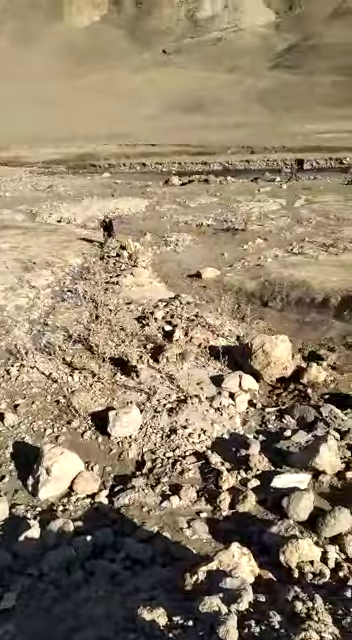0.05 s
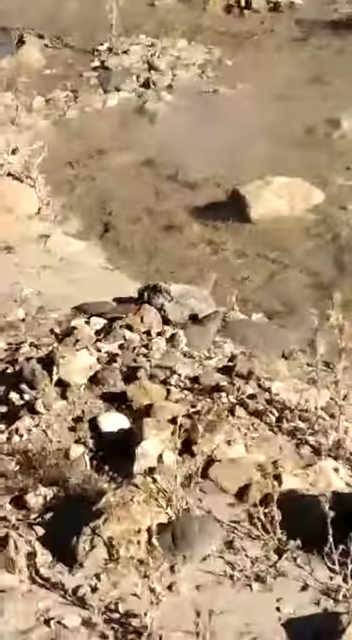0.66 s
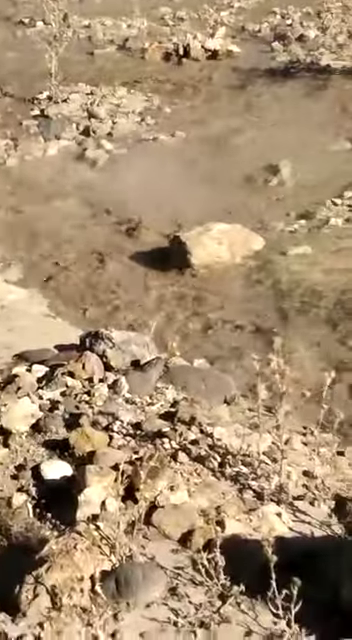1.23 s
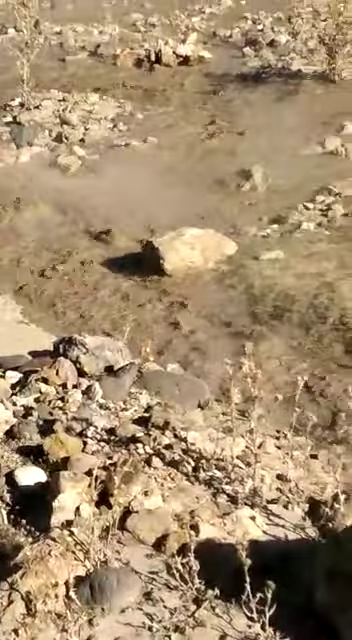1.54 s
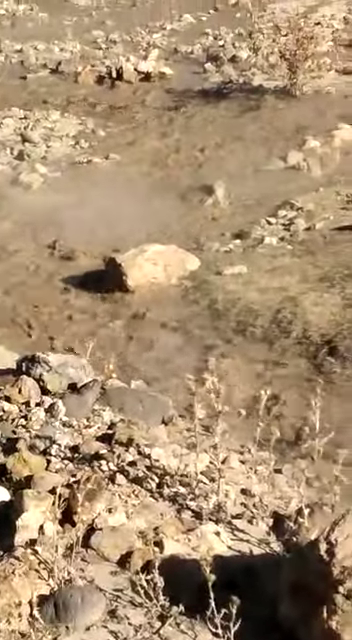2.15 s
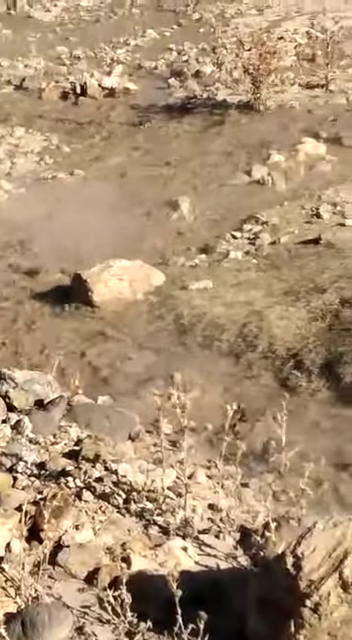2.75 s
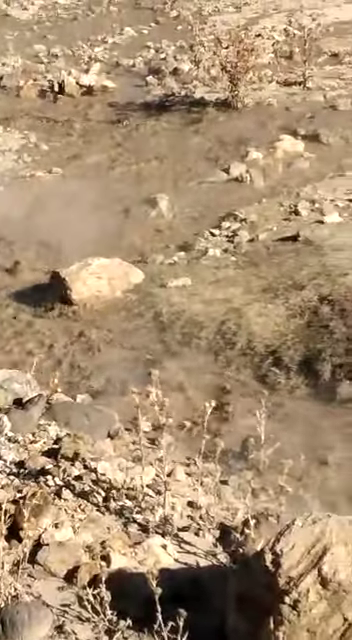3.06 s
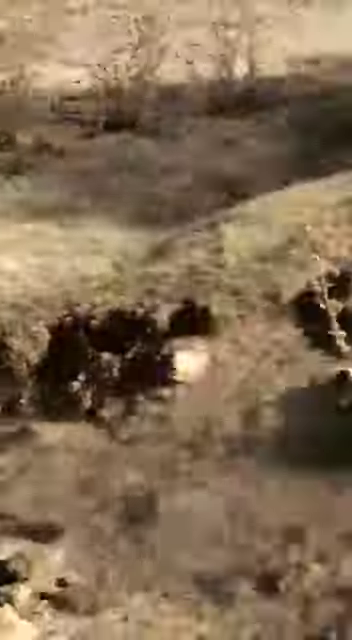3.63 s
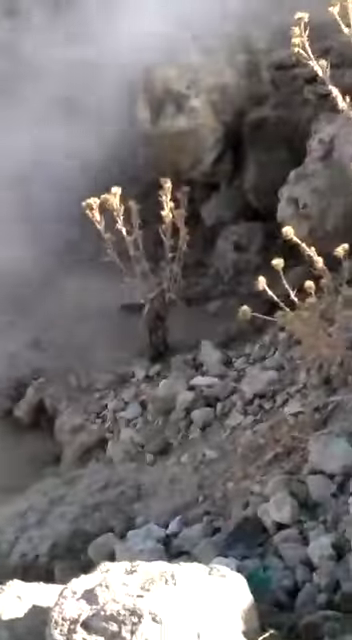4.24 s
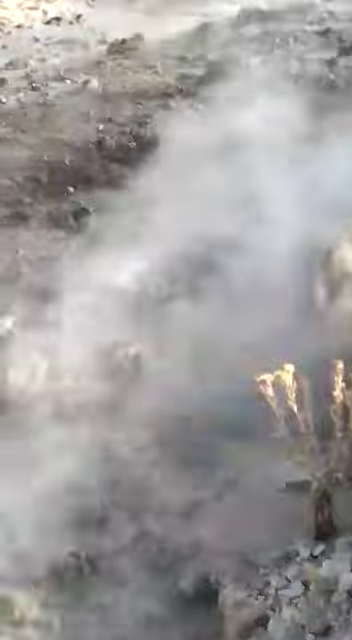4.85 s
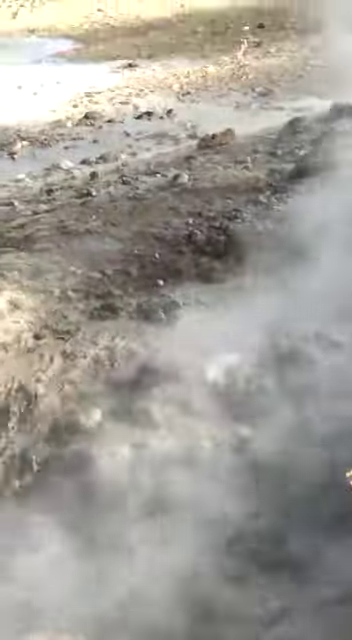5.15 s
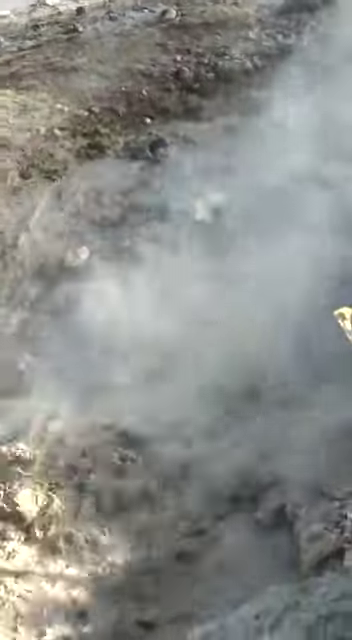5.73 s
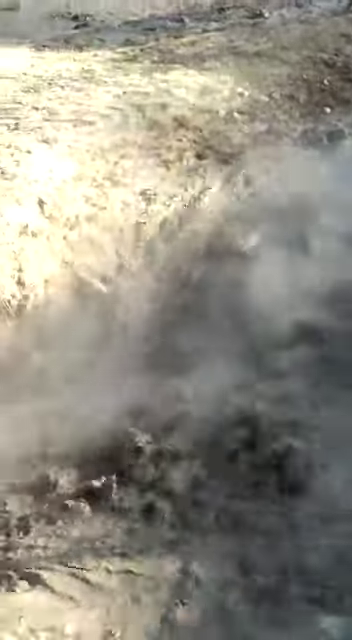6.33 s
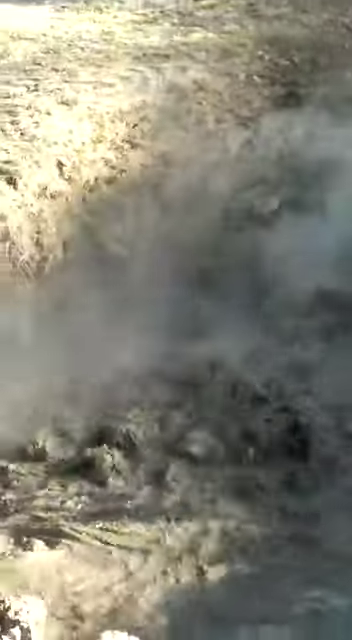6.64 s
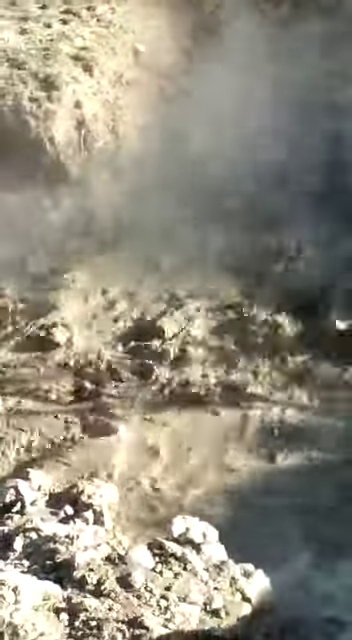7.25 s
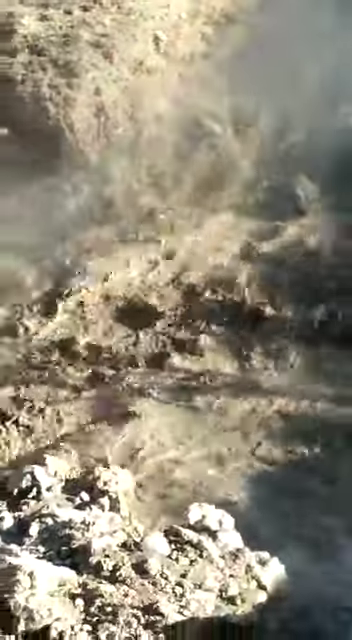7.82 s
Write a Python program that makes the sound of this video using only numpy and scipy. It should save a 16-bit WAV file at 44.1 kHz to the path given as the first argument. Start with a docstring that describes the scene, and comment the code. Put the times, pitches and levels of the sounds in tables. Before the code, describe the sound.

A hot spring churns in the open, an even rush of foam and spray mixed with bubbling, with no echo. Gusty wind buffets the microphone with a low rumble and sharp flaps, hardest on the left and strongest in the first three seconds. The wind then eases into lighter, scattered puffs on both sides while the water carries on unchanged. One tiny tick sounds on the right about halfway.

```python
"""Hot spring in a gusty wind

A hot spring churns and steams in the open, with no echo: an even rush of foam and spray noise
mixed with ringing bubbles, heard by two small microphones. Turbulent gusts buffet each microphone
port on its own, the left hardest, with a rumble and sharp flaps. One tiny tick sounds on the right."""
import sys
import numpy as np
from scipy import signal
from scipy.fft import rfft, irfft, next_fast_len
from scipy.io import wavfile

SR = 44100
rng = np.random.default_rng(int(sys.argv[2]) if len(sys.argv) > 2 else 0)


def file_out(sig):
    """Save sig as 16-bit WAV at sys.argv[1]."""
    # one column per channel
    cols = np.atleast_2d(sig).T
    # limit, then scale
    lim = np.clip(cols, -1, 1)
    pcm = np.round(lim * 32767).astype(np.int16)
    wavfile.write(sys.argv[1], SR, pcm)


N = 356328

# Slow changes in the water sound. Each row: time in seconds, then churn, splash and spray gains in dB.
WATER_LEVELS = [(0, 1.4, -1, -.3), (.9, .5, 2, .6), (2.2, 0.7, 0.3, 0), (3.3, .4, 1.7, -1),
                (4.15, 0.35, -0.6, 0), (5.2, -0.1, 0.8, 0.3), (5.75, 0.7, -0.5, -1), (6.5, .7, 0, 0.1),
                (8.08, 0.5, -.5, -.6)]
SPLASH_FROM_HZ, SPRAY_FROM_HZ = 1400, 2400
# The water's spectrum at each microphone. Each row: frequency in Hz, spectral density in dB.
WATER_SPECTRUM_LEFT = [(60, -69), (200, -64), (360, -66.5), (520, -61.5), (720, -65), (930, -64.5),
                       (1600, -71.8), (2080, -66.8), (2300, -72), (2900, -85), (3800, -89), (5200, -100),
                       (9000, -115.5), (15500, -120)]
WATER_SPECTRUM_RIGHT = [(60, -79), (200, -60), (310, -67.5), (430, -62), (570, -60), (750, -65),
                        (1100, -66), (1600, -69.5), (2150, -70.5), (3000, -81.5), (4800, -88.5),
                        (7200, -95), (10500, -99), (15500, -115)]
# Water sound common to both microphones. Each row: frequency in Hz, share of the power.
COMMON_SHARE = [(100, .8), (650, .94), (1100, .86), (1550, .68), (2050, .8), (3000, .46), (4200, .52),
                (7000, .15), (15000, .08)]
# The vent's later arrival on the left. Each row: frequency in Hz, phase lag in radians.
LEFT_LAG = [(200, .1), (650, 0.16), (1300, 1.36), (1750, 0.15), (2100, 1.56), (2500, 2.68), (3500, 3.4),
            (4500, 5.2), (6500, 9.5)]
# The left microphone turns towards the steam. Each row: time in seconds, treble gain in dB.
FACING_TREBLE = [(0, -4), (1.2, -2), (2.1, -4.5), (3.6, -3.2), (4.15, -0.7), (8.08, -1.5)]

# The breeze at each port. Each row: time in seconds, strength in dB, tilt towards the bass in dB.
PORT_BREEZE_LEFT = [(0, -19.5, -2.5), (.4, -17.5, -0.5), (1.15, -19.5, -1), (1.55, -23, -3),
                    (2.15, -33, -5.5), (2.78, -18.5, -0.5), (2.98, -30.5, -2), (3.7, -35.5, 6.5),
                    (4.55, -38, 0), (4.9, -27.5, 6.5), (5.45, -32.5, 7), (6.0, -40, 2), (6.8, -43.5, 3.5),
                    (7.6, -36, 4.5), (8.08, -35, 0.5)]
PORT_BREEZE_RIGHT = [(0, -29, -1), (1.1, -27.5, 7), (1.4, -20.5, -1), (1.75, -26.5, 1), (2.2, -24, 0),
                     (3.35, -23, 1.5), (4.15, -42, -8), (4.65, -39, 3.5), (5.3, -36, 4), (5.7, -42.5, 1),
                     (6.4, -29, 4.5), (7.2, -33.5, 2.5), (8.0, -30.5, 1)]
# Gusts across one port. Each row: start in seconds, length in seconds, strength in dB, port.
PORT_GUSTS = [(0.077, 0.14, -12.5, "left"), (0.15, 0.099, -24, "right"), (0.287, 0.063, -11, "left"),
              (0.724, 0.11, -14, "left"), (0.924, .04, -11.5, "left"), (1.217, .15, -11.5, "left"),
              (1.42, 0.096, -18.5, "left"), (1.673, .21, -10.5, "left"), (1.924, 0.08, -12, "left"),
              (2.147, 0.12, -10.5, "left"), (2.271, .15, -10, "left"), (2.597, .11, -19.5, "right"),
              (2.645, 0.046, -11.5, "left"), (2.862, 0.016, -17.5, "left"), (3.14, 0.053, -21, "left"),
              (3.283, .12, -19.5, "right"), (3.786, 0.032, -17.5, "left"), (3.928, 0.046, -21.5, "left"),
              (4.348, 0.014, -25, "left"), (4.66, 0.16, -17, "left"), (4.765, .07, -22, "right"),
              (4.893, 0.031, -15.5, "left"), (4.956, 0.058, -24.5, "right"), (5.09, 0.034, -23, "left"),
              (5.202, 0.014, -19, "right"), (5.218, 0.11, -29, "left"), (5.323, 0.095, -22, "right"),
              (5.554, 0.023, -16, "left"), (5.62, .13, -23.5, "left"), (5.817, 0.02, -28, "right"),
              (6.16, .04, -24.5, "right"), (6.228, 0.051, -27.5, "left"), (6.424, 0.02, -23, "right"),
              (6.7, 0.054, -19.5, "right"), (6.975, 0.04, -29, "left"), (7.088, .03, -28.5, "left"),
              (7.26, 0.021, -34, "left"), (7.32, 0.047, -28.5, "right"), (7.438, 0.16, -23, "left"),
              (7.761, 0.012, -21, "left"), (7.891, 0.21, -25.5, "left"), (8.05, .04, -22.5, "right")]
MODERATE_GUST_DB, GUST_ATTACK_S, GUST_RELEASE_S = -20, .023, .04
# Buffeting in a moderate gust. Each row: frequency in Hz, relative level of an octave band in dB.
BUFFET_SPECTRUM_LEFT = [(16, -41), (30, -28.5), (60, -24), (120, -19), (220, -24.5), (450, -28), (700, -39),
                        (1000, -51.5), (1400, -73.5), (2200, -79)]
BUFFET_SPECTRUM_RIGHT = [(16, -30), (30, -26.5), (60, -23.5), (120, -24), (220, -20.5), (450, -49.5),
                         (700, -40.5), (1000, -32), (2200, -68)]
# Faster air sheds smaller eddies, so highs grow most. Each row: frequency in Hz, dB per dB of gust.
BUFFET_GROWTH = [(20, 0), (45, .5), (90, 0.75), (140, 1.0), (400, 0.85), (1200, 2.2)]
# The hardest flaps of air. Each row: time in seconds, relative level in dB, centre in Hz, port.
HARD_FLAPS = [(0.309, -17, 390, "left"), (0.335, -3, 396, "left"), (0.348, -8, 440, "left"),
              (0.567, -9.5, 500, "left"), (0.948, 0, 480, "left"), (1.168, -8.5, 590, "left"),
              (1.358, -7.5, 800, "left"), (1.415, -6.5, 850, "left"), (1.447, -4.5, 850, "left"),
              (1.587, -4, 805, "left"), (1.673, -11, 704, "left"), (1.718, -11, 624, "left"),
              (1.757, -5.5, 720, "left"), (1.974, 6, 259, "left"), (2.198, -2.5, 820, "left"),
              (2.3, 1, 630, "left"), (2.367, -7, 820, "left"), (2.633, -5.5, 630, "left"),
              (2.666, -6, 700, "left"), (2.855, -0.5, 418, "left"), (3.791, -9, 149, "left"),
              (4.696, -8, 250, "left"), (4.754, -13, 790, "left"), (4.9, -6, 420, "left"),
              (4.953, -10.5, 398, "right"), (5.098, -4.5, 146, "left"), (5.199, -9.5, 90, "right"),
              (5.406, -12.5, 198, "right"), (5.575, -3, 322, "left"), (5.668, -15, 630, "left"),
              (6.727, -12, 520, "right"), (6.756, -11, 300, "right"), (7.478, -10.5, 450, "left"),
              (7.768, -7, 384, "left")]

# The tick's time and modes. Each row: frequency in Hz, level in dB, seconds to fall by 60 dB.
TICK_S, TICK_MODES = 3.921, [(6400, -42, .014), (12900, -54, .012)]


def from_db(db):
    """Amplitude ratio of a level in decibels."""
    return 10 ** (np.asarray(db) / 20)


def unit_power(x):
    """Normalisation to a mean square of one."""
    return x / np.sqrt(np.mean(x ** 2) + 1e-20)


def in_time(rows):
    """Linear interpolation of each column at every sample."""
    times, *columns = np.transpose(rows)
    return [np.interp(np.arange(N) / SR, times, column) for column in columns]


def at_hz(points, hz):
    """Interpolation along log frequency."""
    known_hz, values = np.transpose(points)
    return np.interp(np.log(hz + 1e-9), np.log(known_hz), values)


def drift(rate_hz):
    """Low-passed noise wanders smoothly with a spread of one."""
    pole = np.exp(-40 * np.pi * rate_hz / SR)  # one step per 20 samples
    slow = signal.lfilter([1], [1, -2 * pole, pole * pole], rng.standard_normal(N // 20 + 4002))[4000:]
    return np.interp(np.arange(N) / 20, np.arange(len(slow)), unit_power(slow))


def band(x, low, high):
    """Band-pass filtering, at unit power."""
    return unit_power(signal.sosfilt(signal.butter(2, [low, high], "band", fs=SR, output="sos"), x))


def shaped(x, response):
    """Filtering multiplies the spectrum by a response, a function of Hz."""
    size = next_fast_len(N)
    hz = np.arange(size // 2 + 1) * SR / size
    return irfft(rfft(x, size) * response(hz), size)[:N]


def bubbles(hz, per_s, ring_cycles):
    """Damped resonance: bubbles of uneven strength burst at random, each ringing for a few cycles."""
    bursting = rng.random(N) < per_s / SR
    strength_db = np.minimum(rng.exponential(1, N), 4)
    impulses = np.where(bursting, from_db(strength_db) * rng.choice([-1, 1], N), 1e-18)
    radius = np.exp(-np.log(1000) * hz / (ring_cycles * SR))
    angle = 2 * np.pi * hz / SR
    return unit_power(signal.lfilter([1, 0, -1], [1, -2 * radius * np.cos(angle), radius ** 2], impulses))


def churning(bubble_db, slosh_db, flicker_db):
    """Amplitude modulation: foam hiss and bubbles, near even in power per Hz, swell as water heaves."""
    churn_db, splash_db, spray_db = in_time(WATER_LEVELS)
    edges = np.geomspace(50, 17000, 21)
    foam, slosh, out = rng.standard_normal((2, N)), drift(3.9), 0
    for k, (low, high) in enumerate(zip(edges, edges[1:])):
        hz = np.sqrt(low * high)
        sound = band(foam[k % 2], low, high)
        if 350 < hz < 4800:
            sound = unit_power(sound + from_db(bubble_db) * bubbles(hz, per_s=.3 * hz, ring_cycles=4.6))
        flow_db = churn_db if hz < SPLASH_FROM_HZ else splash_db if hz < SPRAY_FROM_HZ else spray_db
        level_db = flow_db + slosh_db * slosh + flicker_db * drift(32)
        out += np.sqrt(high - low) * from_db(level_db) * sound
    return out


def body_shadow(sound, above_hz=2750):
    """Acoustic shadow: the device's body shades short waves while the microphone faces away."""
    treble = shaped(sound, lambda hz: 1 - 1 / (1 + (hz / above_hz) ** 10))
    treble_db, = in_time(FACING_TREBLE)
    return sound + (from_db(treble_db) - 1) * treble


def hot_spring():
    """Partial coherence: the vent reaches both microphones, right first; the stream differs in each."""
    vent = churning(bubble_db=-2.5, slosh_db=.75, flicker_db=1.07)

    def microphone(spectrum, lags):
        stream = churning(bubble_db=-4, slosh_db=.4, flicker_db=1)
        gain = lambda hz: from_db(at_hz(spectrum, hz))
        share = lambda hz: at_hz(COMMON_SHARE, hz)
        phase = lambda hz: np.exp(-1j * at_hz(LEFT_LAG, hz)) if lags else 1
        direct = shaped(vent, lambda hz: gain(hz) * np.sqrt(share(hz)) * phase(hz))
        around = shaped(stream, lambda hz: gain(hz) * np.sqrt(1 - share(hz)))
        return direct + around

    left = body_shadow(microphone(WATER_SPECTRUM_LEFT, lags=True))
    return np.array([left, microphone(WATER_SPECTRUM_RIGHT, lags=False)])


def wind_strength(breeze_db, side, puff_db=2.5):
    """Unsteady flow, in dB: each gust builds before its start, overtakes the breeze, holds and decays."""
    t = np.arange(N) / SR
    strength = from_db(breeze_db + puff_db * np.tanh(drift(7)))
    for start, length, db, port in PORT_GUSTS:
        if port == side:
            early, late = np.maximum(start - t, 0), np.maximum(t - start - length, 0)
            decay = np.minimum((early / GUST_ATTACK_S) ** 2 + late / GUST_RELEASE_S, 20)
            strength = np.maximum(strength, from_db(db) * np.exp(-decay))
    return 20 * np.log10(strength)


def buffeting(wind_db, tilt_db, spectrum, lump_db, eddy_hz, lump_from_hz, flutter_db, puff_db):
    """Turbulent pressure on a port: a fluttering rumble whose finer swirls come in lumps as eddies pass."""
    excess_db = wind_db - MODERATE_GUST_DB
    lull = 1 / (1 + from_db(excess_db))  # weak wind comes in separate puffs
    wobble_db = (flutter_db + puff_db * lull) * np.tanh(drift(22.4))
    edges = np.geomspace(14, 2500, 16)
    air, eddies, out = rng.standard_normal((2, N)), np.tanh(drift(eddy_hz)), 0
    for k, (low, high) in enumerate(zip(edges, edges[1:])):
        hz = np.sqrt(low * high)
        lumps = unit_power(from_db(lump_db * eddies * hz / (hz + lump_from_hz) + wobble_db))
        swell_db = tilt_db * np.tanh(np.log(162 / hz))  # big slow eddies shift power below 162 Hz
        level_db = at_hz(spectrum, hz) + at_hz(BUFFET_GROWTH, hz) * excess_db + swell_db
        out += np.sqrt(np.log2(high / low)) * from_db(level_db) * lumps * band(air[k % 2], low, high)
    return out


def flaps(rows):
    """Bipolar pulses: an eddy crossing a port is a quick pressure flip inside a slower push and pull."""
    out, offsets = np.zeros(N), np.arange(-700, 701)
    flip = lambda phase: phase * np.exp((1 - phase ** 2) / 2)
    for (time, db, hz), sign in zip(rows, rng.choice([-1, 1], len(rows))):
        phase = 2 * np.pi * hz * offsets / SR
        pressure = flip(phase) + from_db(-7) * flip(phase / 2.6)
        out[np.clip(round(time * SR) + offsets, 0, N - 1)] += sign * from_db(db) * pressure
    return out


def sputter(wind_db, count, over_wind_db, spread_db, low_hz, high_hz):
    """Intermittency: lesser flaps come at random, harder and sharper the stronger the wind."""
    when, size, weakness = rng.random((count, 3)).T
    local_db = wind_db[(when * N).astype(int)]
    hz = low_hz * (high_hz / low_hz) ** size * from_db(.16 * (local_db - MODERATE_GUST_DB))
    level_db = local_db + over_wind_db - spread_db * weakness
    return flaps(np.column_stack([when * N / SR, level_db, hz]))


def hard_flaps(side, gap_s=.0075, loss_db=8.5):
    """Vortex shedding: eddies come in a row, so a hard flap has a weaker one before and after it."""
    scatter = rng.uniform(.6, 1.5, (len(HARD_FLAPS), 3, 2))
    rows = []
    for (time, db, hz, port), draws in zip(HARD_FLAPS, scatter):
        if port == side:
            for k, (spacing, pitch) in zip((-1, 0, 1), draws):
                rows.append((time + k * spacing * gap_s, db - abs(k) * loss_db, hz * pitch ** abs(k)))
    return flaps(rows)


def left_wind():
    """Turbulence at the windward port: lumpy eddies and a crackle of flaps."""
    breeze_db, tilt_db = in_time(PORT_BREEZE_LEFT)
    wind_db = wind_strength(breeze_db, "left")
    rumble = buffeting(wind_db, tilt_db, BUFFET_SPECTRUM_LEFT,
                       lump_db=10.5, eddy_hz=55, lump_from_hz=230, flutter_db=3, puff_db=2)
    crackle = sputter(wind_db, count=600, over_wind_db=6, spread_db=15, low_hz=142, high_hz=480)
    return from_db(-1.35) * rumble + crackle + from_db(-2.5) * hard_flaps("left")


def right_wind():
    """Turbulence at the sheltered port: a rumble with slower, softer thumps."""
    breeze_db, tilt_db = in_time(PORT_BREEZE_RIGHT)
    wind_db = wind_strength(breeze_db, "right")
    rumble = buffeting(wind_db, tilt_db, BUFFET_SPECTRUM_RIGHT,
                       lump_db=3.5, eddy_hz=63, lump_from_hz=120, flutter_db=6, puff_db=0)
    thumps = sputter(wind_db, count=300, over_wind_db=7, spread_db=8.5, low_hz=90, high_hz=280)
    return from_db(-.9) * rumble + thumps + from_db(-2) * hard_flaps("right")


def port_saturation(pressure, limit=.97, cutoff_hz=1800):
    """Soft saturation and a low-pass: the port rounds off the strongest buffets and keeps them dull."""
    rounded = pressure / (1 + (pressure / limit) ** 4) ** .25
    return signal.sosfilt(signal.butter(5, cutoff_hz, fs=SR, output="sos"), rounded)


def tick():
    """Free decay: two high modes die within milliseconds."""
    age = np.maximum(np.arange(N) / SR - TICK_S, 0)
    return sum(from_db(db) * np.sin(2 * np.pi * hz * age) * np.exp(-np.log(1000) * age / t60)
               for hz, db, t60 in TICK_MODES)


def scene():
    """Superposition of the water, the wind on both ports and the tick on the right."""
    water = hot_spring()
    wind = port_saturation(np.array([left_wind(), right_wind()]))
    return water + wind + tick() * [[0], [1]]


def record(dry, cutoff_hz=15700, fade_s=.004):
    """Band limiting: a steep low-pass cuts the top, and both ends fade briefly."""
    low_pass = signal.ellip(10, .1, 80, cutoff_hz, fs=SR, output="sos")
    from_end = np.minimum(np.arange(N), np.arange(N)[::-1])
    return signal.sosfilt(low_pass, dry) * np.minimum(from_end / (fade_s * SR), 1)


dry = scene()
out = record(dry)
file_out(out)
```